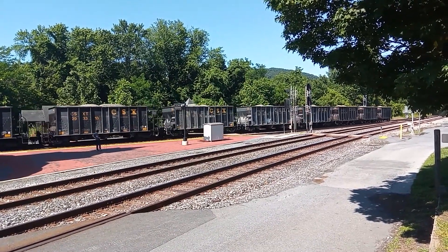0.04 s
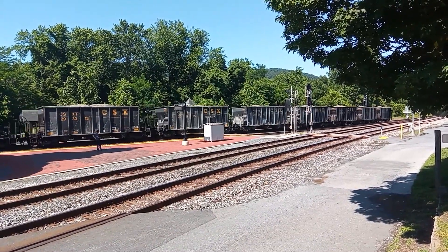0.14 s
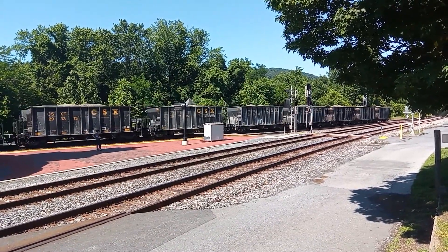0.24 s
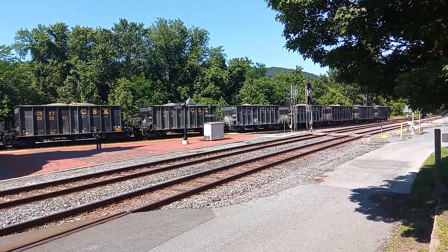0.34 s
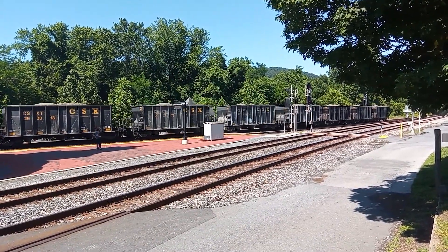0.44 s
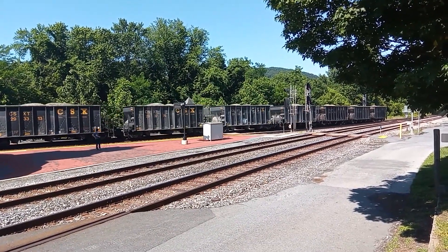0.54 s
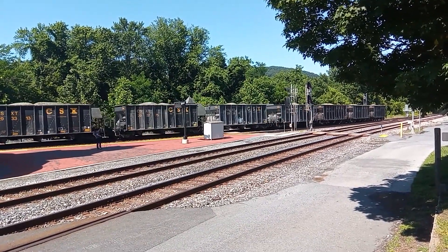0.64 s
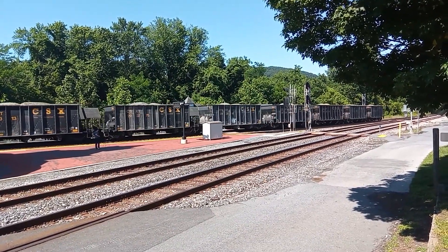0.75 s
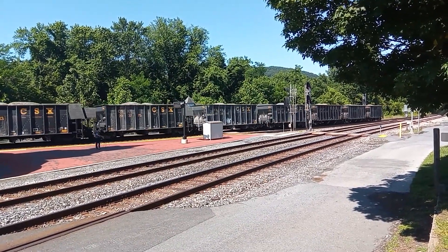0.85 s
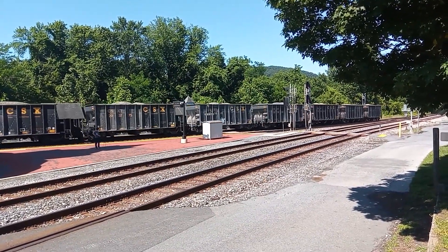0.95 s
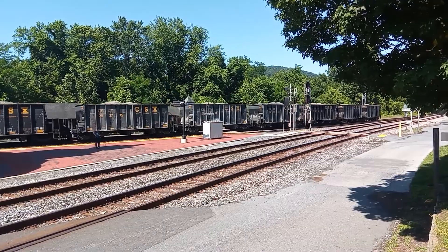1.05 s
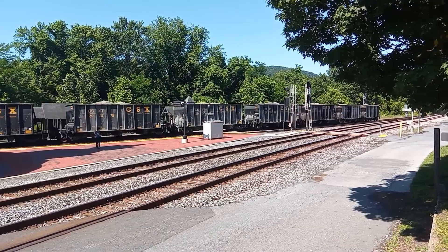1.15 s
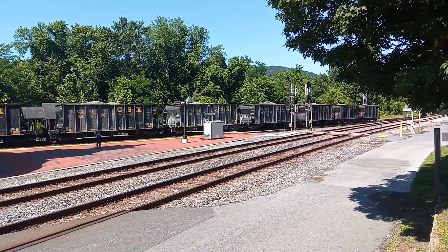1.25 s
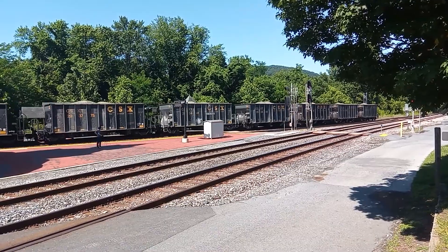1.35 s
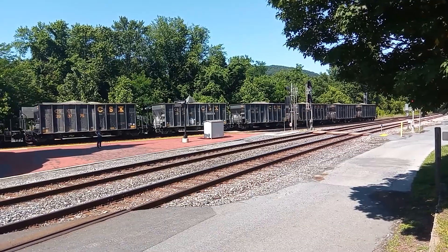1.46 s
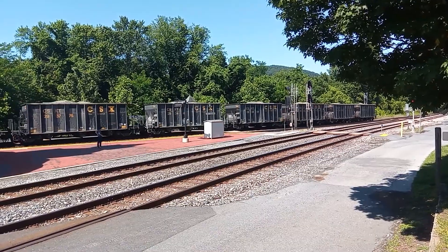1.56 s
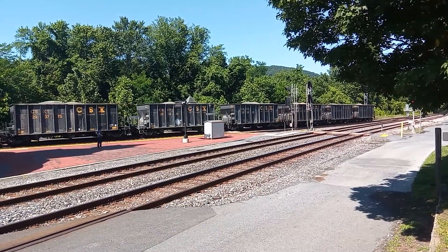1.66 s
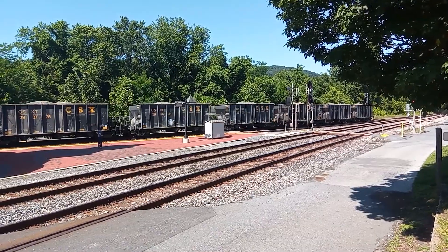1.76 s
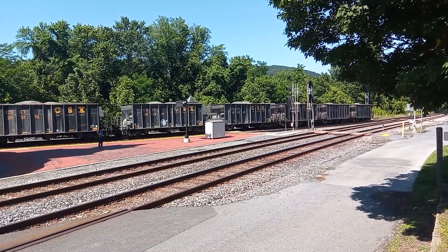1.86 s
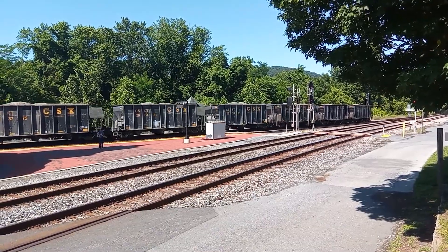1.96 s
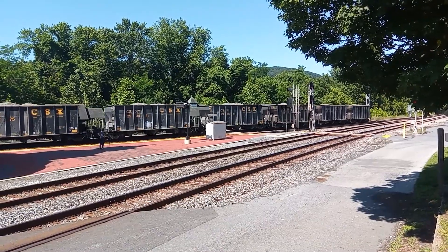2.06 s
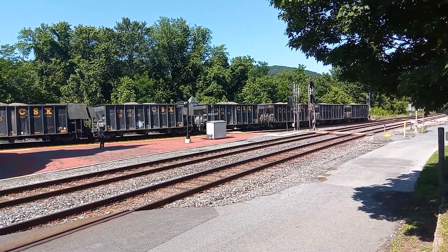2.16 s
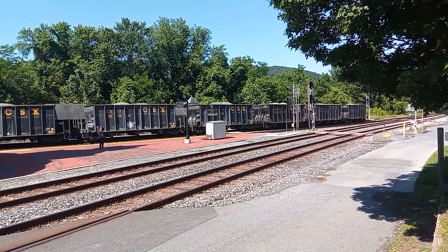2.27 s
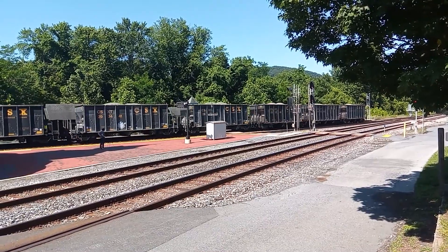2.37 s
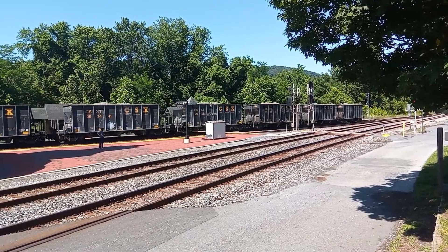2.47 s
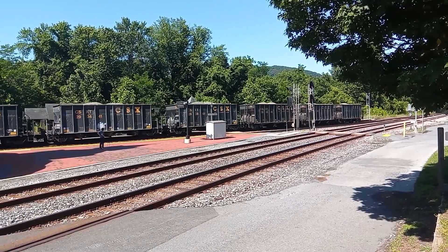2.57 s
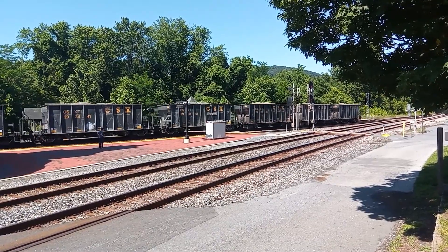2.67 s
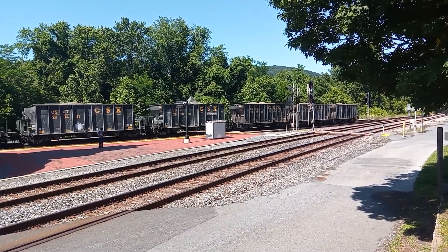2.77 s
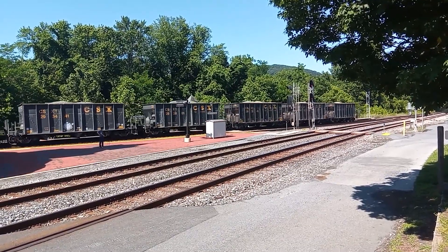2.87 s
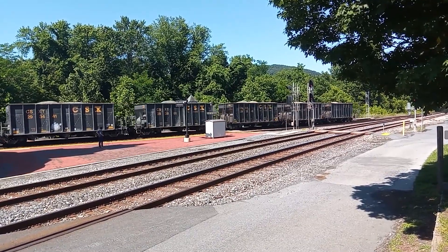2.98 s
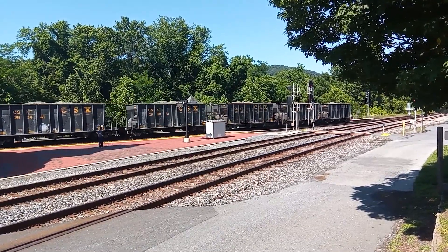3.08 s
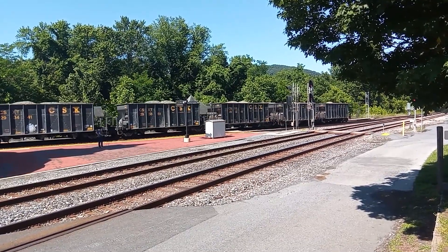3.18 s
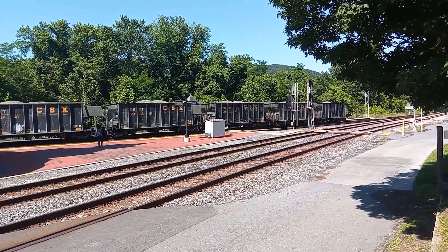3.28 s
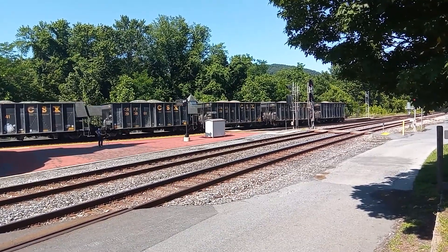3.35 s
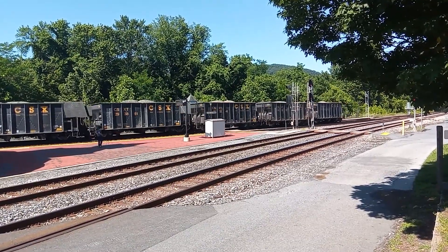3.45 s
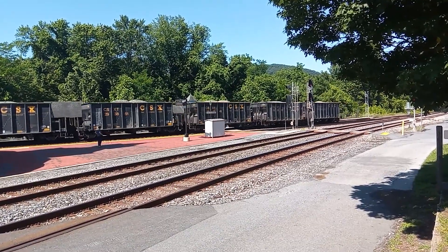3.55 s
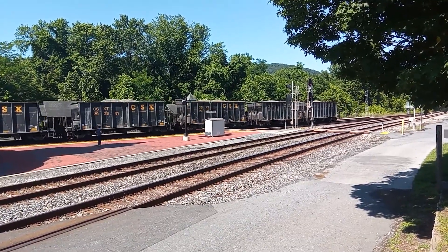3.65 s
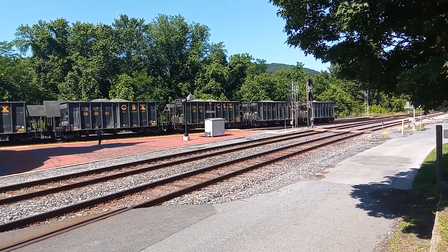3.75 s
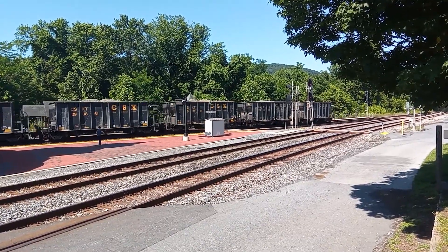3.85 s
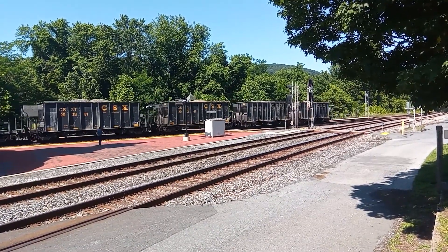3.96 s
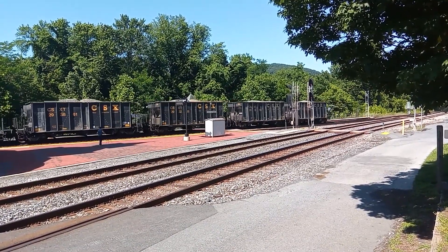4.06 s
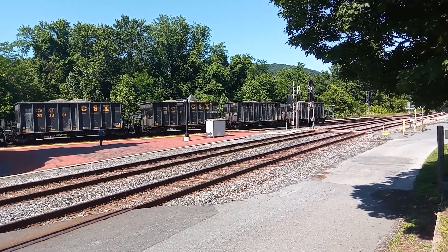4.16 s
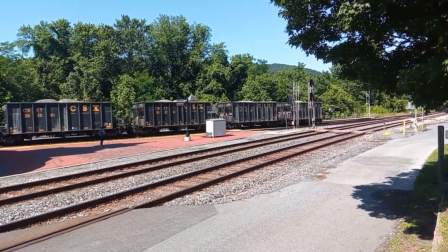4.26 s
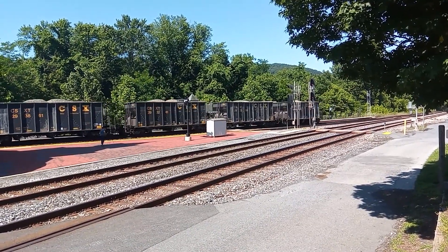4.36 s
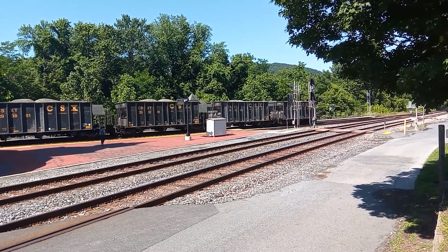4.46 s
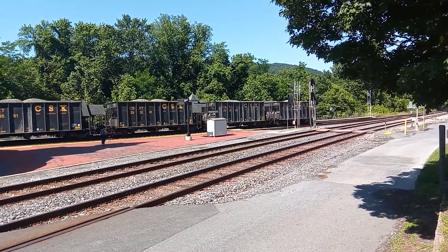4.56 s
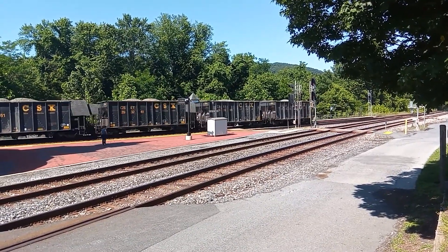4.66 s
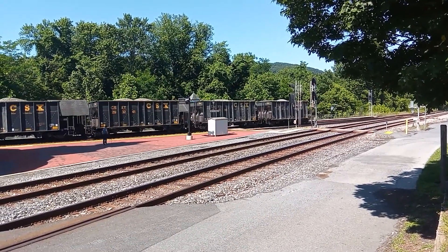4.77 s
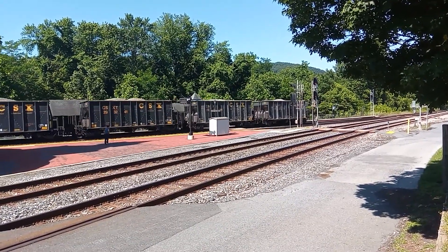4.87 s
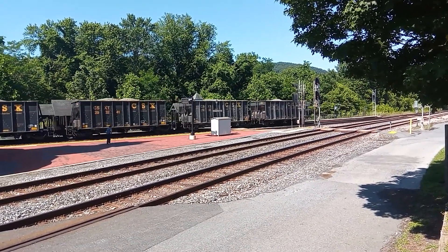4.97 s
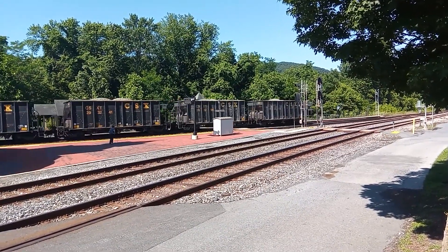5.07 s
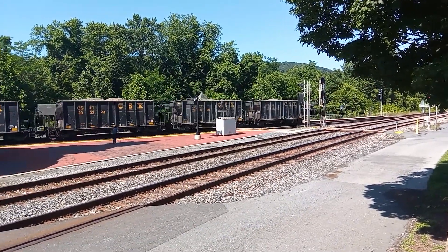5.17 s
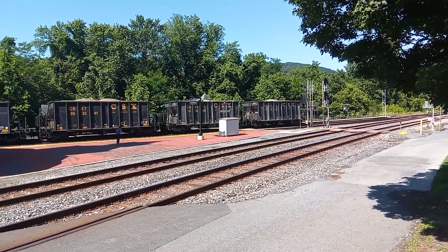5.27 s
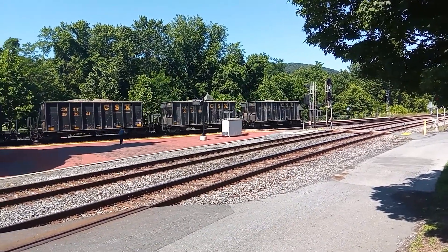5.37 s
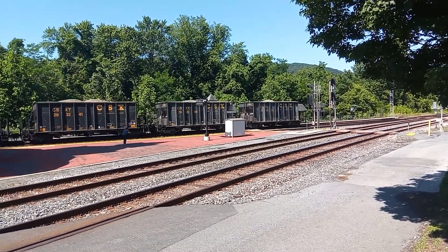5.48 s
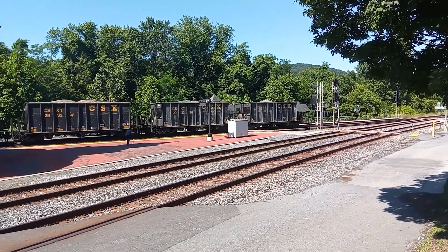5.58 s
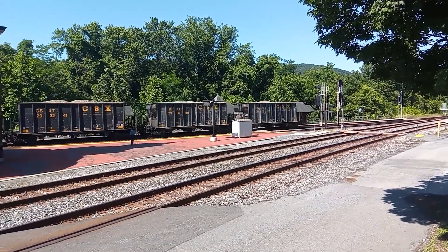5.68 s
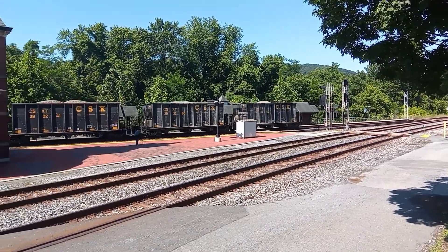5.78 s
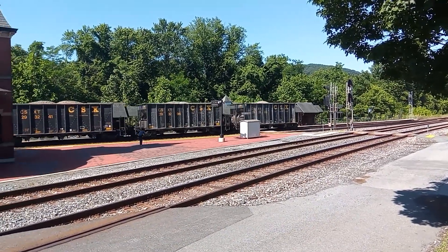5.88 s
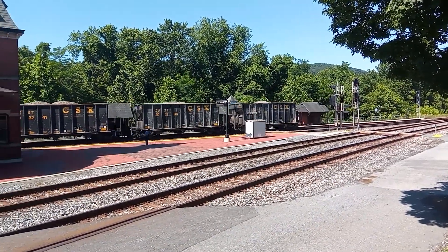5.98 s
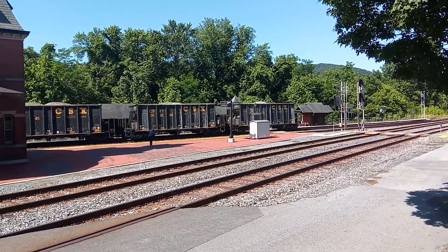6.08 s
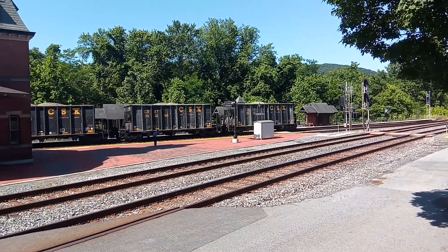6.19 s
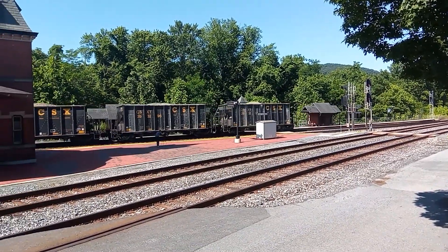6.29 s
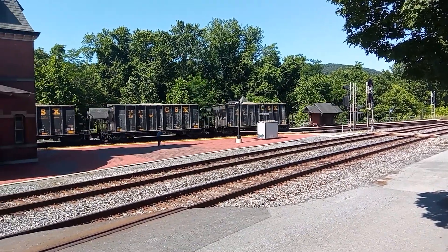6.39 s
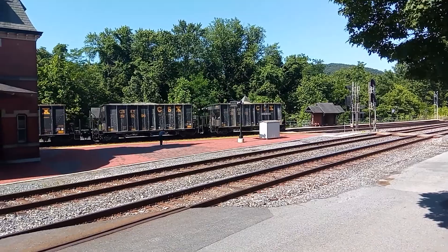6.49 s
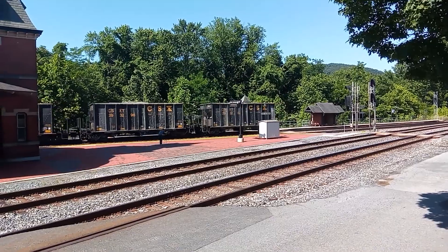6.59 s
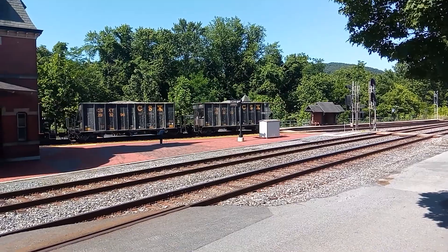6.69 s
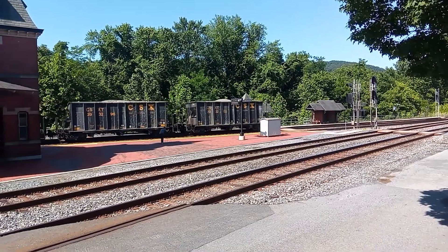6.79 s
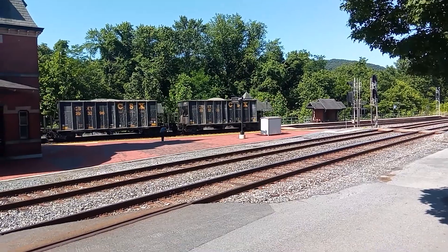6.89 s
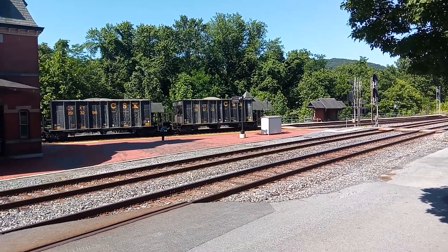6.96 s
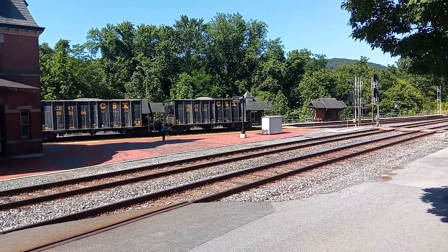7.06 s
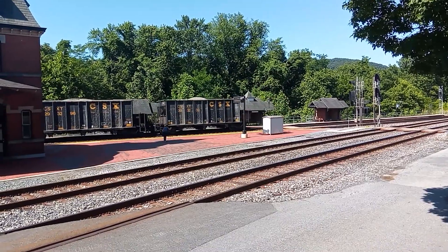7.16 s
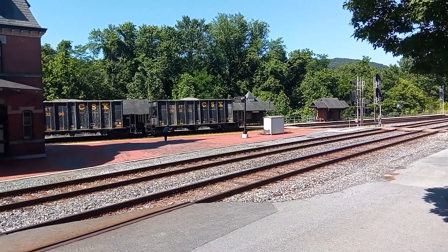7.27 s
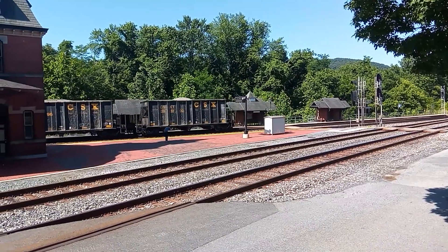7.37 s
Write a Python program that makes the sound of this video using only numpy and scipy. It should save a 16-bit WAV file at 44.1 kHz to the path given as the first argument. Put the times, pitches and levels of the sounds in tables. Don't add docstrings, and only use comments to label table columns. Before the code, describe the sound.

A distant open-air microphone hears heavy hopper cars passing. Wheel flanges screech in high, unsteady tones that grip and slip, each sinking slightly in pitch, with thin whistles above and rough rasps below. A low body drone comes and goes under the roar. Later the screech recedes, deep rumble rises, and thudding rail-joint knocks become clear; the final cars begin drawing away.

```python
import sys
import numpy as np
from scipy import signal
from scipy.fft import rfft, irfft
from scipy.io import wavfile

SR = 44100
rng = np.random.default_rng(int(sys.argv[2]) if len(sys.argv) > 2 else 0)


def level_to_linear(level):
    exponent = np.asarray(level, float) / 20
    return 10 ** exponent


def persist_wave(psi):
    counts = np.round(np.clip(psi, -1, 1) * 32767).astype(np.int16)
    wavfile.write(sys.argv[1], SR, np.atleast_2d(counts).T)


N = 327663
HZ = np.maximum(np.arange(N // 2 + 1) * SR / N, 1)

# (frequency [Hz], density [dB per Hz])
ROAR_COLOUR = [(330, -30), (450, -12.5), (700, -8.5), (1000, -11), (1200, -13), (1550, -3.5), (2950, -13),
               (4300, -6), (5600, -2), (6600, 0), (7200, -18.5), (8100, -34), (13650, -23.5), (14400, -13)]
SINK_PER_S = .006


def rms_one(x):
    return x / np.sqrt(np.mean(np.abs(x) ** 2) + 1e-20)


def drift(rate, size=N):
    r = np.exp(-80 * np.pi * rate / SR)
    coarse = rng.standard_normal(size // 40 + 2002)
    slow = signal.lfilter([1], [1, -2 * r, r * r], coarse)[2000:]
    unit = slow * (1 - r * r) ** 1.5 / np.sqrt(1 + r * r)
    return np.interp(np.arange(size) / 40, np.arange(len(slow)), unit)


def noise(shape):
    return irfft(rfft(rng.standard_normal(N)) * shape, N)


def colour(points):
    hz, db = np.transpose(points)
    return level_to_linear(np.interp(np.log(HZ), np.log(hz), db))


def swells(t, rows, idle_db, rise, fall):
    peaks = []
    for s, hold, db in rows:
        before = np.maximum(s - t, 0)
        after = np.maximum(t - s - hold, 0)
        peaks.append(db - rise * before - fall * after)
    return level_to_linear(np.maximum(np.max(peaks, axis=0), idle_db))


def add(out, s, sound):
    at = round(s * SR)
    out[at:at + len(sound)] += sound[:N - at]


def train_db(hz):
    # (time [s], weight rolling nearby [dB], flange pressure [dB])
    passing = [(0.0, -37, -24), (0.97, -38, -21), (1.74, -35, -22), (2.09, -36, -22), (2.36, -33, -24),
               (2.77, -34, -27), (3.14, -35, -26), (3.43, -34, -28), (3.79, -35, -27), (4.51, -35, -28),
               (5.19, -31, -27), (6.17, -27, -34), (6.48, -27, -29), (6.81, -27, -33), (6.95, -25, -34),
               (7.43, -29, -35)]
    # (frequency [Hz], share of weight [1], share of pressure [1])
    follow = [
        (200, 1.01, 0.01),
        (750, .8, 0.01),
        (2200, .1, .3),
        (5500, 0.01, .99),
        (11000, .2, .6),
    ]
    last_car_s, air_loss_db_per_s = 6.8, 17
    t = np.arange(N) / SR
    s, weight, pressure = np.transpose(passing)
    at, *shares = np.transpose(follow)
    of_weight, of_pressure = [np.interp(np.log(hz), np.log(at), share) for share in shares]
    level = of_weight * (weight - weight.mean()) + of_pressure * (pressure - pressure.mean())
    absorbed = air_loss_db_per_s * min(hz / 11000, 1) ** 2 * np.maximum(t - last_car_s, 0)
    return np.interp(t, s, level) - absorbed


def stick_slip(hz, rough, rate):
    size = len(hz)
    flutter = drift(rate, size=size) + 1j * drift(rate, size=size)
    swing = np.sqrt(1 - rough) + np.sqrt(rough / 2) * flutter
    phase = 2 * np.pi * np.cumsum(hz) / SR + 7 * rng.random()
    return np.sqrt(2) * np.real(swing * np.exp(1j * phase))


def singers(trim_db):
    # (entry frequency [Hz], leaving frequency [Hz], entry roughness [0-1], leaving roughness [0-1])
    modes = [(5562, 5460, .15, .15), (5590, 5540, .3, .2), (6545, 6452, .05, .6), (7530, 7395, .1, .4),
             (4587, 4545, .3, .6), (4600, 4552, .4, .4), (6632, 6612, .2, .4)]
    # (entry time [s], leaving time [s], idling level [dB])
    passages = [(0.0, 2.2, -25), (2.25, 3.65, -33), (2.3, 4.9, -28), (3.5, 4.95, -37), (0.0, 1.5, -33),
                (2.3, 3.7, -36), (0.0, 0.6, -31)]
    # (time [s], hold [s], level [dB])
    grips = [
        [(0.0, .08, -21), (0.195, .01, -16), (0.45, .05, -15), (0.66, .15, -14.5), (0.89, .165, -13),
         (1.095, .01, -13), (1.21, .11, -16), (1.4, .04, -17.5), (1.58, .05, -14), (1.8, .11, -19),
         (1.96, .16, -14)],
        [(2.6, .03, -23), (2.83, .02, -17), (2.99, .04, -14), (3.26, .1, -21)],
        [(2.55, .07, -18), (2.73, .03, -15), (2.93, .06, -18), (3.24, .1, -17), (3.48, .06, -12),
         (3.69, .03, -15.5), (3.82, .02, -17), (4.0, .05, -19.5), (4.2, .22, -22), (4.53, .08, -22)],
        [(3.86, .1, -23), (4.13, .68, -25)],
        [(0.4, .03, -25)],
        [(2.56, .17, -25)],
        [(0.0, .08, -17)],
    ]
    bite_db_per_s, slip_db_per_s = 170, 130
    out = np.zeros(N)
    for (enter_hz, leave_hz, *rough), (start, end, idle_db), rows in zip(modes, passages, grips):
        t = np.arange(start, end, 1 / SR)
        hz = np.linspace(enter_hz, leave_hz, len(t)) + 5.0 * drift(3.0, size=len(t))
        tone = stick_slip(hz, rough=np.linspace(*rough, len(t)), rate=40.0)
        grip = swells(t, rows, idle_db + trim_db, bite_db_per_s, slip_db_per_s)
        add(out, start, signal.windows.tukey(len(t), .04) * level_to_linear(trim_db) * grip * tone)
    return out


def squeals(trim_db):
    # (time [s], length [s], entry
    # frequency [Hz], level [dB])
    catches = [(0.07, 0.28, 5492, -21.5), (0.096, 0.28, 5606, -22), (0.304, 1.17, 3995, -33.5),
               (0.375, 0.78, 5988, -40), (0.44, 1.01, 5236, -28.5), (0.45, 0.94, 6521, -34),
               (0.642, 1.2, 7487, -38), (0.785, 0.49, 4746, -28), (0.908, 0.79, 4638, -29),
               (1.171, 1.57, 5456, -27), (1.17, 1.7, 2229, -35), (1.79, 0.36, 5535, -20),
               (2.139, 0.66, 3977, -32), (2.61, 0.3, 5533, -26), (2.6, 0.3, 3620, -36),
               (3.132, 0.76, 5285, -32), (3.275, 0.41, 5629, -29.3), (3.658, 0.26, 5720, -29.1),
               (3.71, 0.35, 4550, -35), (3.8, 0.55, 3975, -34), (3.95, 0.61, 2212, -32),
               (4.209, 0.4, 6426, -24), (4.3, 0.9, 7430, -31), (4.72, 0.93, 2215, -35.4),
               (4.84, 0.42, 5511, -30.0), (5.045, 1.1, 7435, -36), (5.61, 0.43, 6485, -30),
               (5.736, 0.26, 6366, -27.8), (6.506, .92, 7443, -35), (7.17, 0.22, 6534, -28.5),
               (0.0, 0.92, 8627, -44), (0.37, 1.36, 9604, -41), (0.489, 1.64, 12863, -43.5),
               (0.57, 0.93, 10627, -45.5), (0.853, 0.84, 8746, -46.4), (1.46, 0.33, 14463, -44),
               (1.52, 1.1, 12845, -49), (2.104, 1.45, 8689, -43.5), (2.26, 1.22, 8596, -45),
               (3.08, 0.82, 15288, -42.1), (3.12, 0.54, 9819, -45), (3.24, 0.77, 10515, -49),
               (3.48, 0.38, 9497, -42), (3.83, 0.85, 14494, -42.2), (4.44, 0.13, 8775, -40),
               (4.72, 0.3, 15293, -40.5), (5.0, 0.23, 11533, -45), (5.24, 0.27, 15128, -31),
               (6.36, 0.81, 14957, -44), (6.734, 0.24, 9078, -51.5)]
    out = np.zeros(N)
    for s, length, hz, db in catches:
        t = np.arange(round((length + 0.031) * SR)) / SR
        tone = stick_slip(hz * (1 - SINK_PER_S * t), rough=.85, rate=28.0)
        grip_db = 2.2 * drift(5.0, size=len(t))
        add(out, s, level_to_linear(db + trim_db + grip_db) * signal.windows.tukey(len(t), .35) * tone)
    return out


def rubbed_wheels(level_db, swell_db, chatter_db, widen):
    # (frequency [Hz], width [Hz], level [dB])
    wheel_modes = [(1610, 56, -13.5), (2185, 112, -6), (2740, 120, -12.5), (3320, 100, -11), (3900, 54, -5),
                   (4573, 68, -3), (5570, 86, 1), (6730, 160, 0.5), (7533, 107, -8.5), (8460, 82, -18),
                   (9360, 200, -22.5), (10580, 220, -21), (11530, 71, -19), (12400, 73, -22.5),
                   (12800, 83, -27), (13600, 180, -35)]
    out = np.zeros(N)
    for hz, width, db in wheel_modes:
        resonance = 1 / (1 + ((HZ - hz) / (width * widen)) ** 2)
        change = train_db(hz) + swell_db * drift(0.97) + chatter_db * drift(20.0)
        out += level_to_linear(level_db + db + change) * noise(resonance)
    return out


def rasps():
    # (time [s], length [s], frequency [Hz], width [Hz], level [dB])
    bites = [(0.0, .4, 990, 40, -43), (.15, .3, 1580, 120, -36), (.7, .3, 2150, 120, -36),
             (.95, .3, 985, 40, -45), (1.0, .25, 3930, 250, -27), (1.75, .5, 1560, 100, -34),
             (2.36, .1, 1050, 80, -37), (2.6, .27, 1770, 25, -37), (2.88, .14, 2150, 100, -34),
             (2.9, .1, 1150, 150, -37), (2.95, .25, 1760, 25, -40), (3.17, .08, 11000, 5000, -40),
             (3.9, .35, 5600, 300, -27), (4.0, .4, 985, 40, -46), (5.0, .6, 6500, 250, -25),
             (6.195, .14, 4600, 250, -26), (6.22, .27, 5480, 70, -27), (6.22, .18, 5040, 50, -35),
             (6.41, .13, 4580, 250, -28), (6.46, .1, 6400, 80, -29), (6.5, .7, 215, 40, -34),
             (6.56, .14, 4580, 250, -27), (6.57, .24, 5470, 60, -24), (7.02, .24, 670, 220, -32)]
    out = np.zeros(N)
    for s, length, hz, width, db in bites:
        size = round(length * SR)
        band = signal.butter(2, [hz - width / 2, hz + width / 2], "band", fs=SR, output="sos")
        shaken = rms_one(signal.sosfilt(band, rng.standard_normal(SR))[-size:])
        add(out, s, level_to_linear(db) * signal.windows.tukey(size, .25) * shaken)
    return out


def roar(level_db, patchy_db, shared_db):
    out = np.zeros(N)
    together = drift(1.7) + drift(8.4)
    shape = colour(ROAR_COLOUR)
    for octave in np.arange(8, 14.5, .5):
        slot = np.cos(np.pi * np.clip(np.log2(HZ) - octave, -.5, .5))
        flicker = patchy_db * (drift(2.4) + drift(29.0)) + shared_db * together
        out += level_to_linear(level_db + train_db(2 ** octave) + flicker) * noise(shape * slot)
    return out


def knocks(trim_db, t60):
    # (time [s], peak level [dB], frequency [Hz])
    joints = [(1.999, -25, 980), (2.192, -20, 700), (2.337, -15, 600), (2.425, -18, 332), (3.407, -15, 345),
              (4.854, -17, 301), (5.033, -18.5, 649), (5.308, -18, 618), (5.744, -17, 361),
              (5.812, -18.5, 526), (5.92, -35, 355), (6.026, -19, 644), (6.145, -15.5, 765),
              (6.279, -32, 677), (6.343, -23, 714), (6.46, -14, 625), (6.55, -12, 301), (6.703, -20, 353),
              (7.085, -9.5, 732), (7.182, -11, 720)]
    out = np.zeros(N)
    t = np.arange(SR // 5) / SR
    shape = (1 - np.exp(-t / 0.0048)) * level_to_linear(-60 * t / t60)
    body = signal.butter(2, [150, 1100], "band", fs=SR, output="sos")
    for s, db, hz in joints:
        puff = rms_one(signal.sosfilt(body, rng.standard_normal(len(t))))
        lower_ring = np.sin(2 * np.pi * .82 * hz * t + 7 * rng.random())
        rings = np.sin(2 * np.pi * hz * t) + 0.45 * lower_ring
        add(out, s, level_to_linear(db + trim_db) * shape * (rings + 0.79 * puff))
    return out


def hum(hz, trim_db):
    # (time [s], hold [s], level [dB])
    drones = [
        (1.85, .3, -35),
        (3.38, .05, -32),
        (3.64, .75, -31),
        (4.74, .2, -32),
        (5.57, .4, -32),
        (7.2, .1, -31),
    ]
    level = swells(np.arange(N) / SR, drones, idle_db=-39, rise=70, fall=25) * level_to_linear(trim_db)
    return level * stick_slip(np.full(N, hz), rough=.35, rate=5.0)


def far_squeals(over_db, count):
    out = np.zeros(N)
    level, pressure = colour(ROAR_COLOUR), train_db(5500)
    for when, pitch, span, strength in rng.random((count, 4)):
        hz = 1400 + 14050 * pitch
        t = np.arange(round((.08 + .35 * span ** 2) * SR)) / SR
        tone = stick_slip(hz * (1 - SINK_PER_S * t), rough=.6, rate=12.0)
        fading = pressure[int(when * N)]
        gain = level[round(hz * N / SR)] * level_to_linear(over_db + 8.0 * strength + 3.0 * pitch + fading)
        add(out, when * N / SR, gain * np.hanning(len(t)) * tone)
    return out


def rumble(level_db, lumpy_db):
    # (frequency [Hz], density [dB per Hz])
    rumble_colour = [(20, -14), (33, -21), (50, -24), (64, -4), (95, -3.5), (140, -6.5), (205, -3.5),
                     (270, -10), (350, -9.5), (450, -29.5), (600, -72)]
    near = 1 / (1 + (105 / HZ) ** 4)
    swell = train_db(200) + lumpy_db * drift(5.3)
    shape = level_to_linear(level_db) * colour(rumble_colour)
    passing = level_to_linear(swell) * noise(shape * np.sqrt(near))
    steady = noise(shape * np.sqrt(1 - near))
    return passing + steady


def scene():
    tones = singers(trim_db=2.1) + squeals(trim_db=0.0) + far_squeals(over_db=-37, count=1100)
    wheels = rubbed_wheels(level_db=-9, swell_db=1.0, chatter_db=2.0, widen=1.67) + rasps()
    rolling = roar(level_db=-11.5, patchy_db=0.98, shared_db=0.68)
    low = knocks(trim_db=-6.5, t60=0.11) + hum(hz=96.2, trim_db=-2.5) + rumble(level_db=-7, lumpy_db=1.85)
    return np.tile(tones + wheels + rolling + low, (2, 1))


def top_cut(x):
    return signal.sosfilt(signal.butter(12, 16480, fs=SR, output="sos"), x)


def record(dry):
    cutoff_hz = 15495
    rounded = 1.05 * np.tanh(dry / 1.05)
    mix = irfft(rfft(rounded) * (HZ < cutoff_hz), N)
    return top_cut(mix)


dry = scene()
out = record(dry)
persist_wave(out)
```